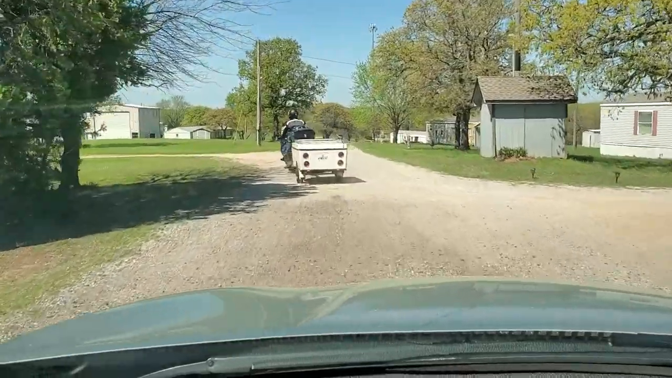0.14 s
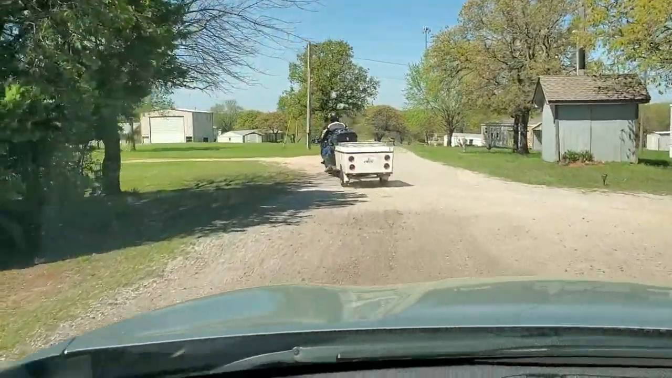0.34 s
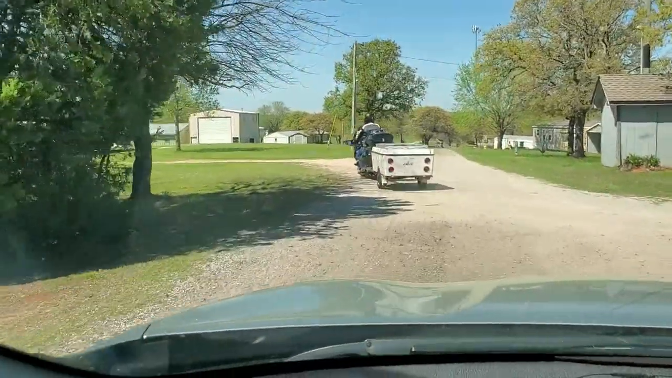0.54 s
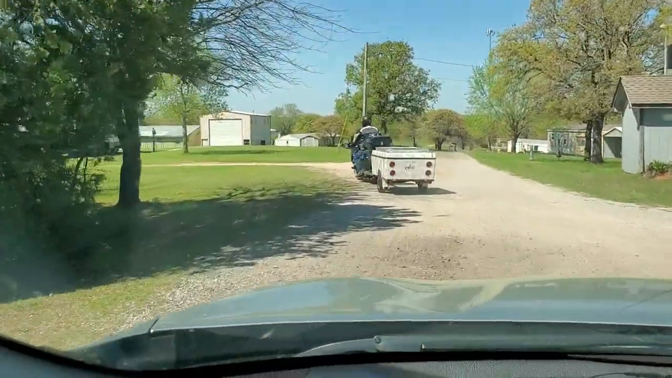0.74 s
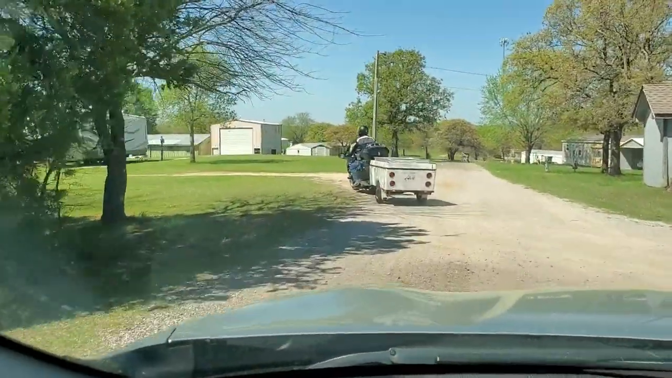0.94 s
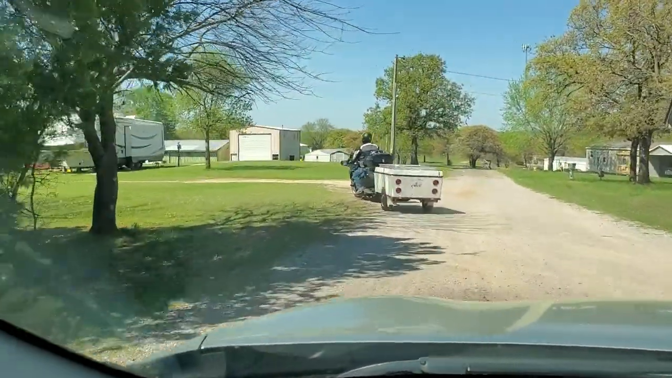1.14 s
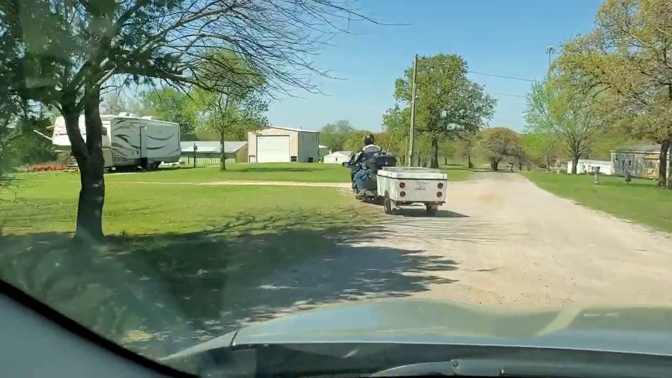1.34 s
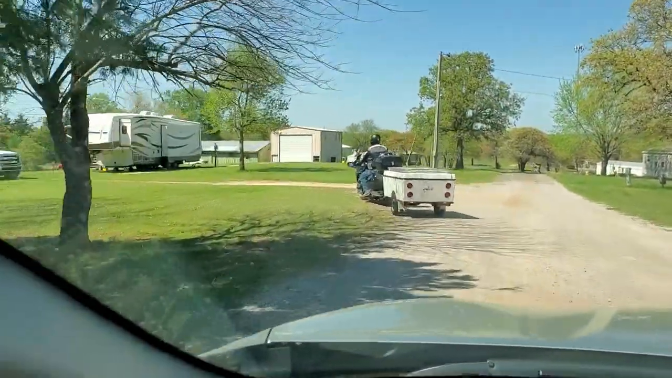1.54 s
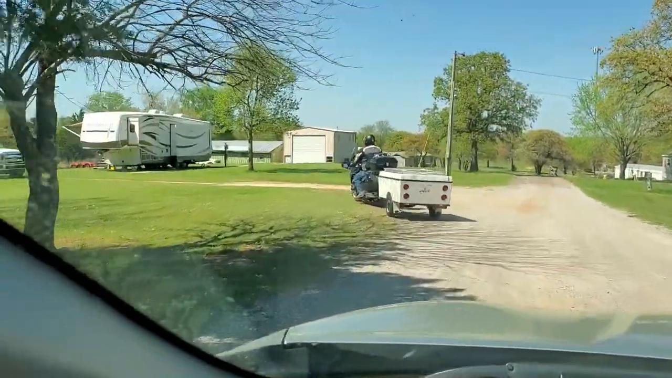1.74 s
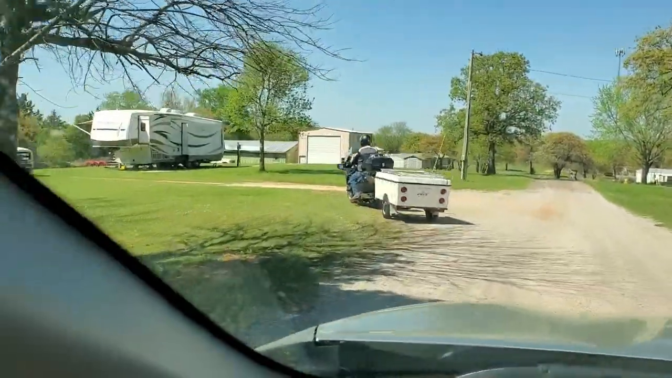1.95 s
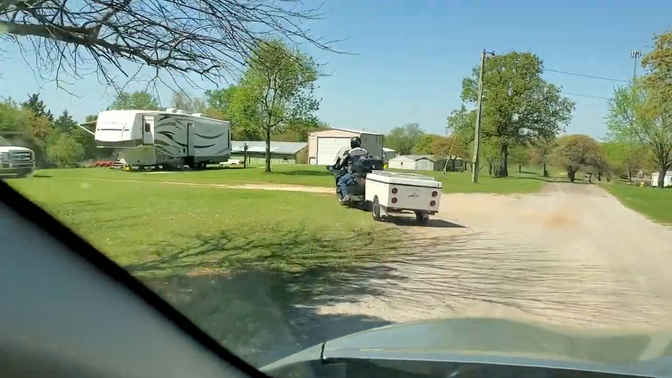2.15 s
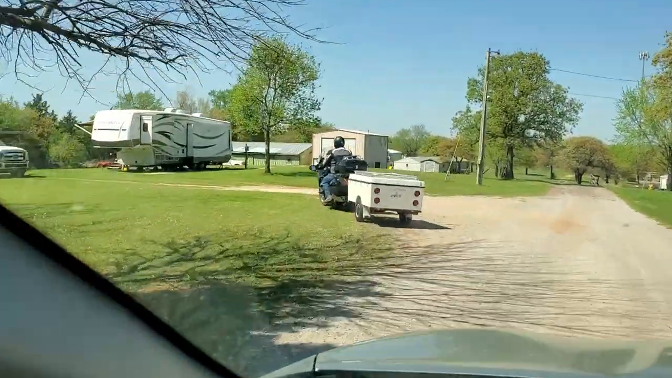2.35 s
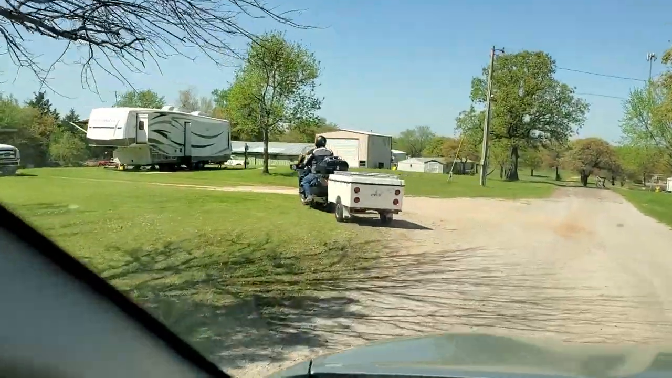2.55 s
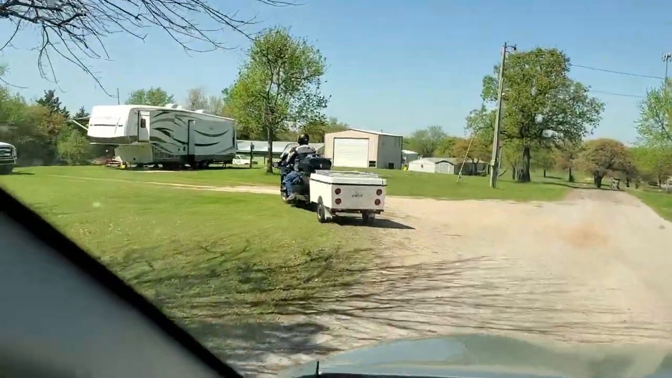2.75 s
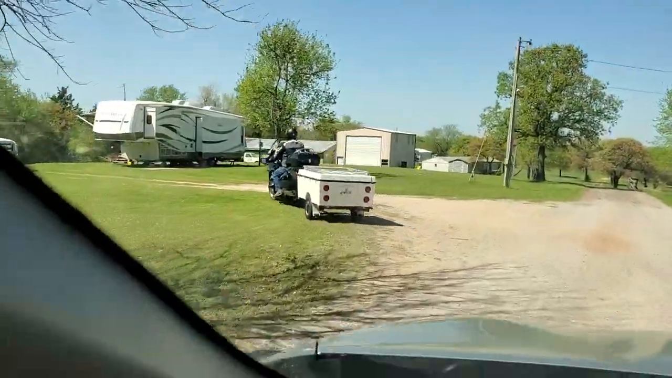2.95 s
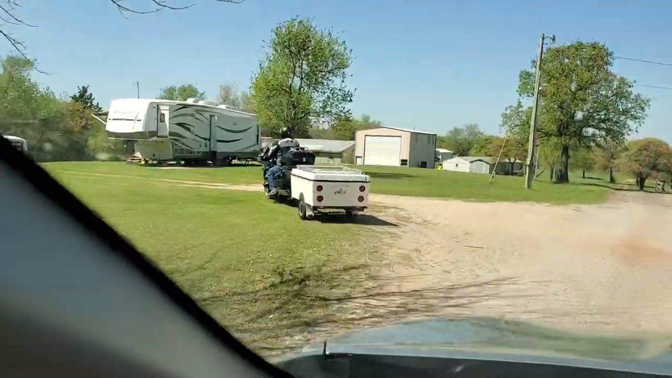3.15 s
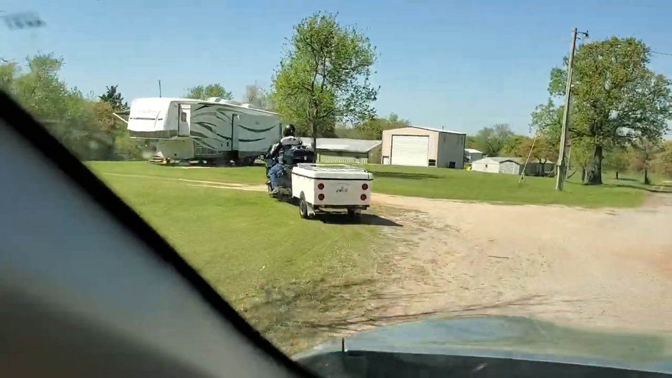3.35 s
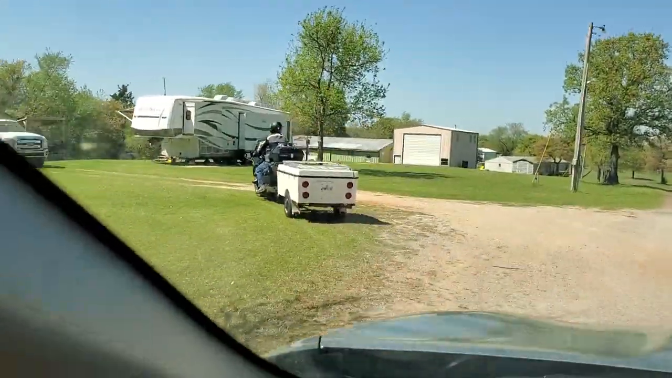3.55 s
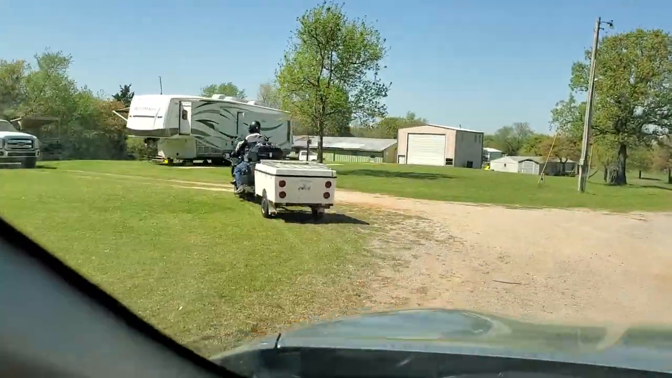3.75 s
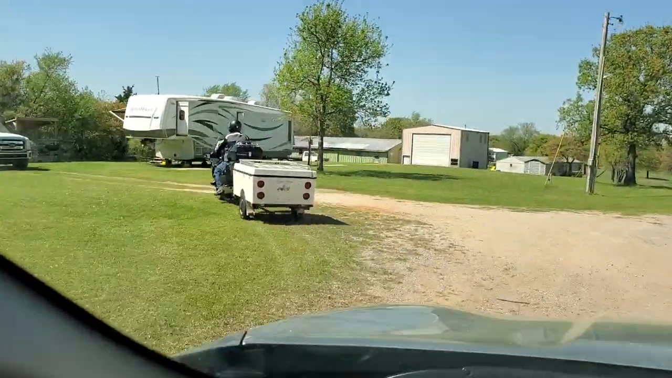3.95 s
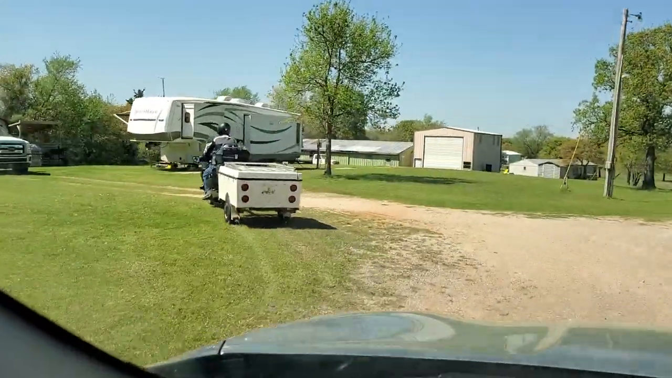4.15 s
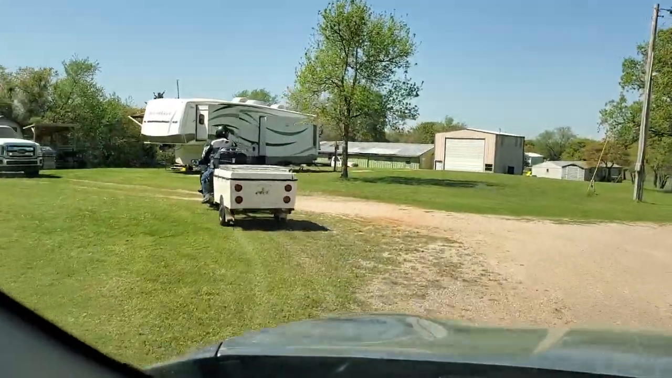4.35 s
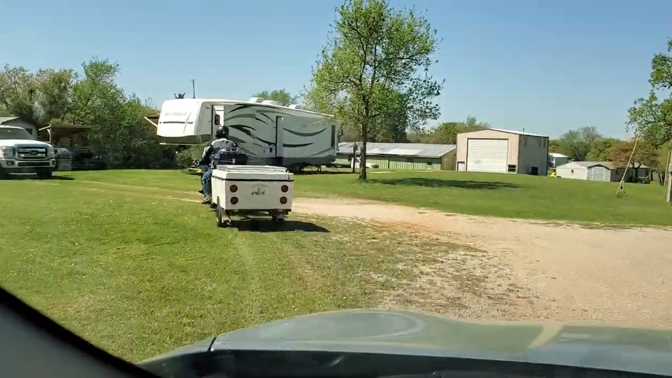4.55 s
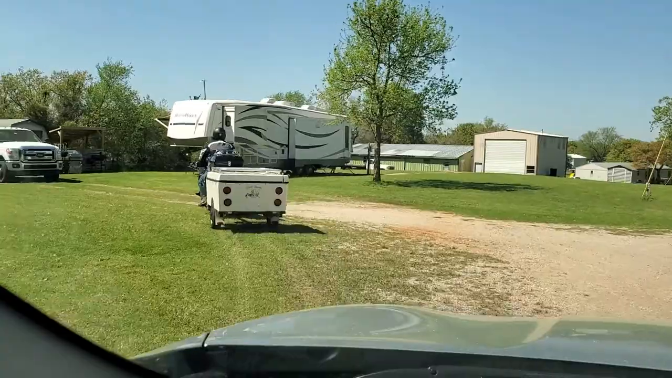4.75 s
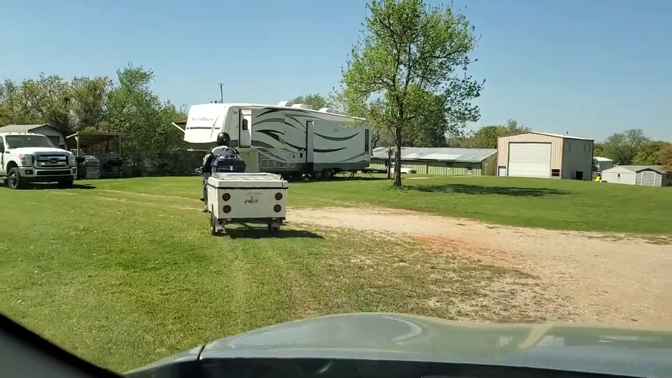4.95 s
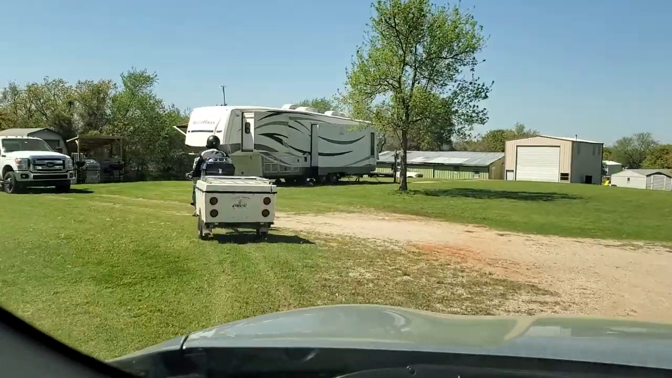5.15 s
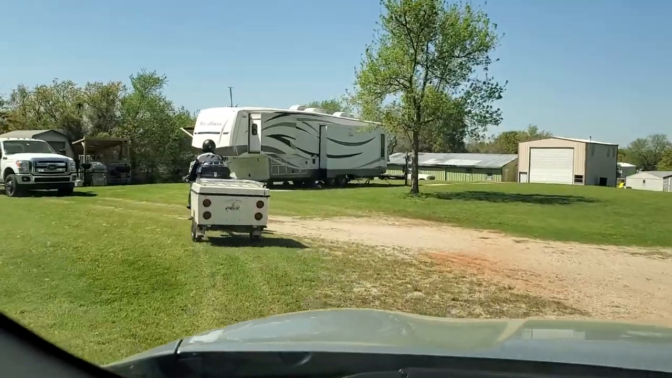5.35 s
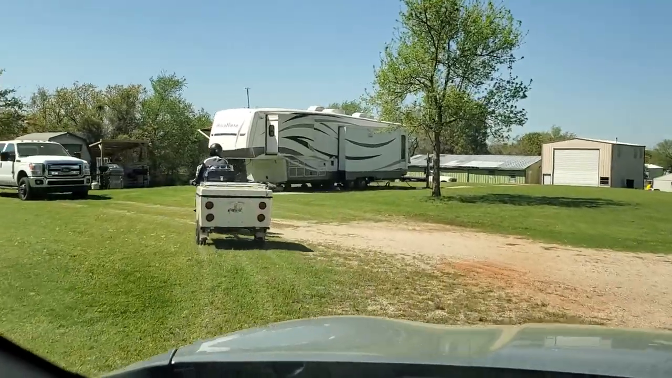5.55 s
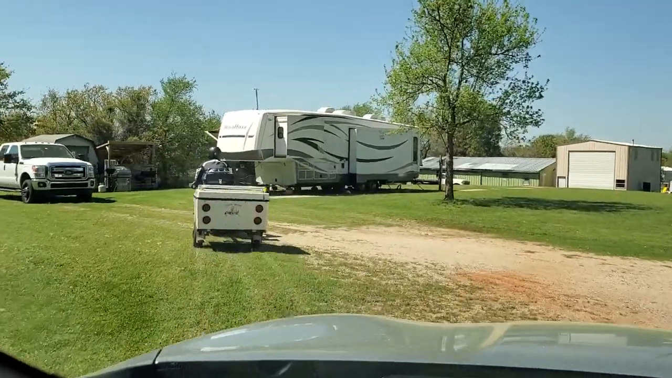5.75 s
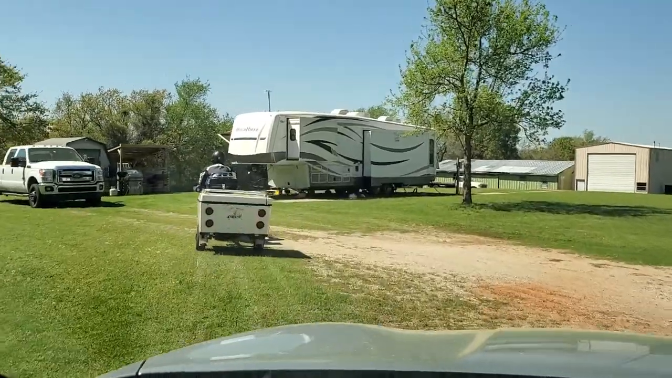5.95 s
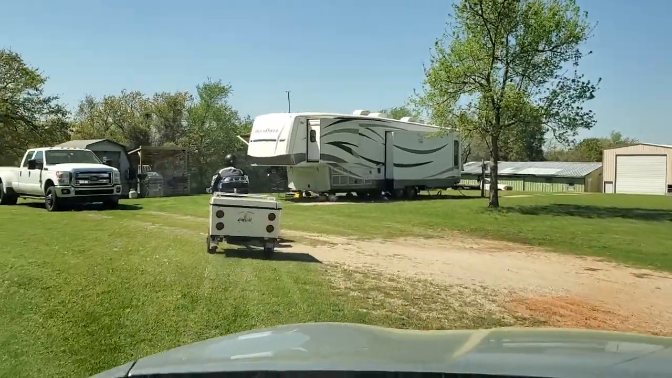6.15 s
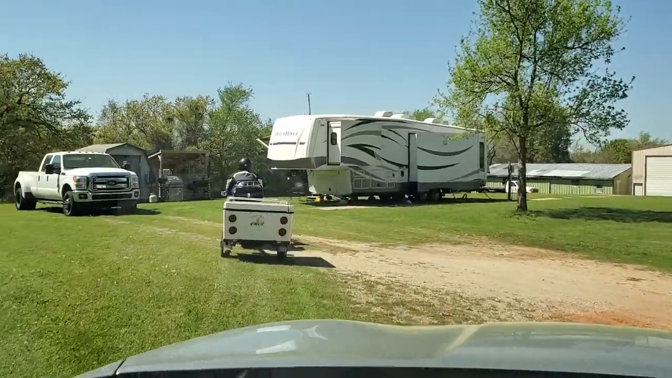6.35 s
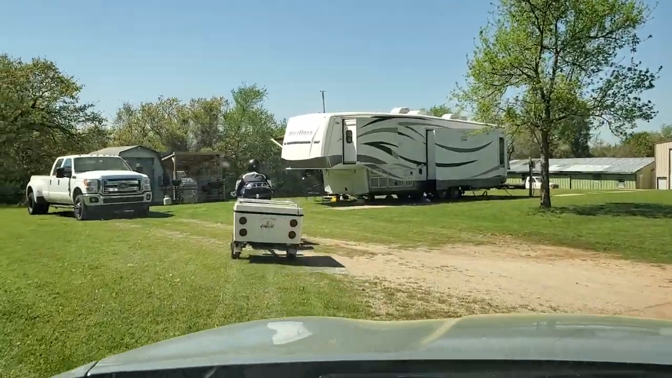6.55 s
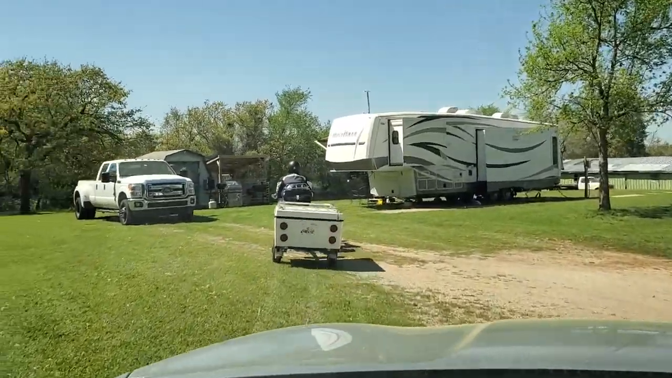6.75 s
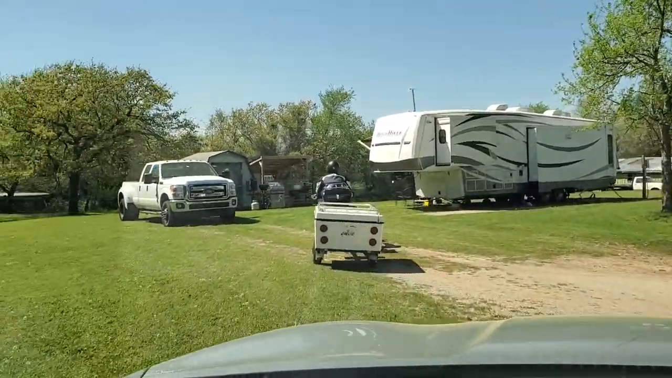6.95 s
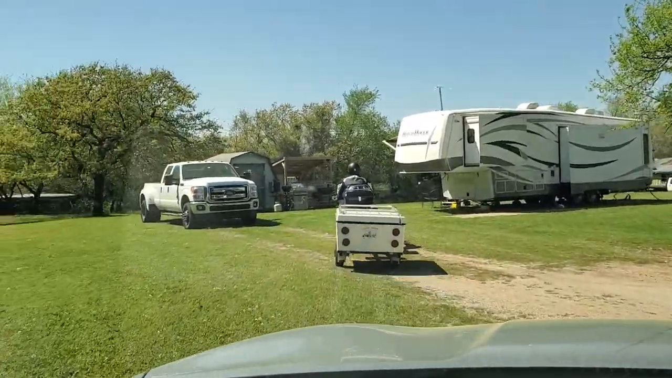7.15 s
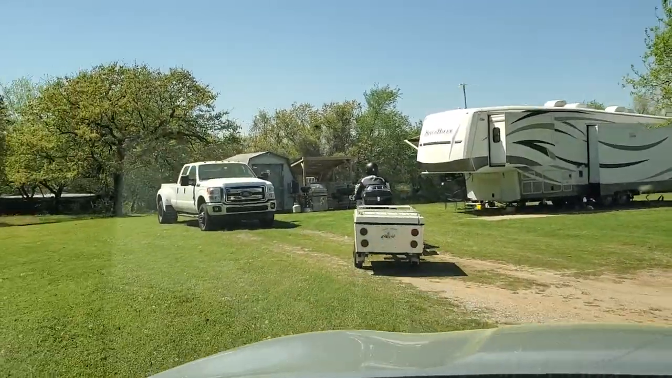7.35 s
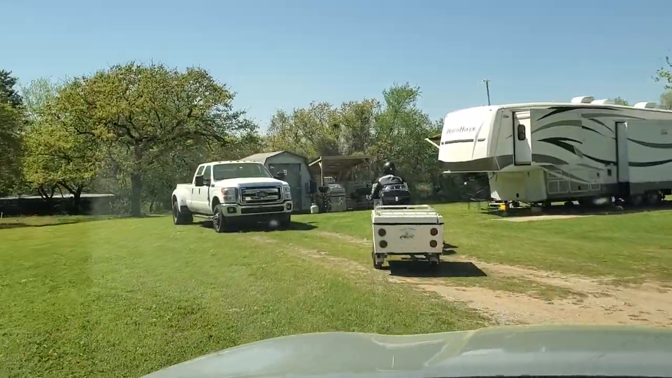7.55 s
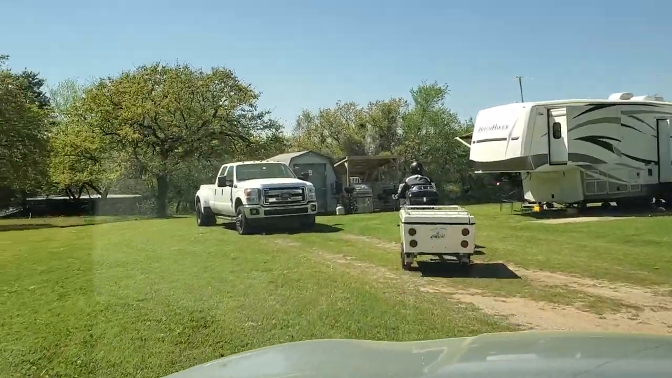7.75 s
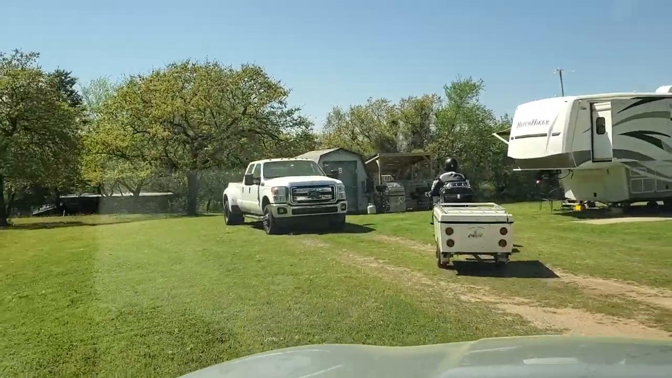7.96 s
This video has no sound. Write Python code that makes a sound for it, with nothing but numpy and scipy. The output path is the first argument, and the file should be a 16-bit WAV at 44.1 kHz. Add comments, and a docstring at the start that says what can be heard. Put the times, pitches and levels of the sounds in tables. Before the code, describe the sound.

A hand-held microphone near the windshield picks up the lumpy, booming rumble of a car rolling slowly over rough ground, with the engine throbbing low and air hissing gently from the vents. Muffled gravel crunch at the start dies away, and several dull suspension thumps follow. A short clatter of handling comes about two thirds through, after which a soft roar and swish of grass rises beneath the cabin rumble.

```python
"""Inside a car rolling slowly off a gravel track, heard by a hand-held camera near the windshield.
At first stones crunch faintly outside, the ground shakes the cabin, the engine hums low and the vents
blow, coloured by the glass as the camera turns. The hand ticks on the case at 1.5 s, and at 3 s a wheel
thumps into the first of four ruts. The crunch fades and the hand knocks on the case near 5.8 s.
By the end grass roars softly in the wheel wells and swishes under the treads, and the vents are louder."""
import sys
import numpy as np
from scipy import signal
from scipy.fft import rfft, irfft, next_fast_len
from scipy.io import wavfile
from scipy.ndimage import uniform_filter1d, map_coordinates

SR = 44100
rng = np.random.default_rng(int(sys.argv[2]) if len(sys.argv) > 2 else 0)


def int16_out(signal):
    """Quantize to a 16-bit WAV file."""
    q = np.round(np.clip(np.atleast_2d(signal).T, -1, 1) * 32767)
    wavfile.write(sys.argv[1], SR, q.astype(np.int16))


N = 356769


# The cabin's deep boom. Each row: frequency in Hz, relative level in dB.
BOOM_SPECTRUM = [(5, -60.5), (14, -29), (22, -6), (29, -11), (35, 10), (44, 10.5), (50, 0.5), (59, -8),
                 (90, -57), (200, -120)]
# The tyres' rumble, just above the boom. Each row: frequency in Hz, relative level in dB.
TYRE_SPECTRUM = [(15, -120), (44, -36), (58, -1.5), (69, 1.5), (84, -4), (98, 1.5), (113, -8.5),
                 (127, -10.5), (142, -21.5), (200, -27.5), (300, -42.5), (900, -120)]

def road_and_engine(low_cut_hz=19):
    """Uneven ground makes the cabin boom in lumps and the tyres rumble over the engine's note."""
    boom_db, tyre_db = ride()
    lumps_db = 1.6 * wobble(13)
    boom = amp(boom_db + lumps_db + 3.0) * shaking(BOOM_SPECTRUM, even_s=0.14)
    body = engine() + jolts() + boom
    body += amp(tyre_db + 4.5) * shaking(TYRE_SPECTRUM, even_s=0.083)
    # the deepest bass is rolled off
    return filtered(body, lambda hz: 1 / np.sqrt(1 + (low_cut_hz / (hz + 1)) ** 8))


def shaking(spectrum, even_s):
    """Random body vibration whose strength stays even over spans longer than even_s."""
    vibration = rush(spectrum)
    power = uniform_filter1d(vibration[1] ** 2, max(int(even_s * SR), 1))
    return unit(vibration / np.sqrt(np.abs(power) + 0.074))


# The slow rise and fall of the boom. Each row: time in seconds, relative level in dB.
BOOM_TREND = [(0, -28.5), (1.7, -27.5), (2.5, -32), (3.8, -31.5), (5.2, -29), (6.1, -34.5), (7.6, -30)]
# The rumble eases as gravel gives way to soft grass. Each row: time in seconds, relative level in dB.
TYRE_TREND = [(0, -25.5), (2.3, -25.5), (5.2, -28.5), (8.09, -32.5)]
# A wheel meets a bump. Each row: centre in seconds, boom lift in dB, rumble lift in dB.
BUMPS = [(0.51, 0, 6), (1.26, 5, 2), (1.56, 5.5, 2.5), (1.96, 7, 3.5), (2.39, 7, -0.5), (3.46, 2, 1.5),
         (3.94, 8.5, 1), (4.55, 5, 5), (5.88, 3, 2), (6.53, 2.5, 2.5), (7.3, 5, 0.5), (7.52, 6, 1)]
# The ride goes briefly smooth. Each row: centre in seconds, boom change in dB, rumble change in dB.
LULLS = [(0.19, -10, 0), (1.03, -10, 0), (2.78, 3.5, -6), (4.09, -7, 1.5), (4.84, -9, -3), (5.43, -2, -4),
         (5.6, -9, -3), (5.98, -4, -3.5), (6.35, -11, -8), (6.75, -8, -1.5), (7.15, -7, -1), (7.42, -9, 0),
         (7.62, 0, -4)]

def ride():
    """Level curves in dB for boom and rumble: slow trends, lifted by bumps and lowered by lulls."""
    trend = np.array(curves(BOOM_TREND) + curves(TYRE_TREND))
    rises = sum(np.outer(rise_db, bump(s)) for s, *rise_db in BUMPS)
    drops = sum(np.outer(drop_db, lull(s)) for s, *drop_db in LULLS)
    return trend + rises + drops


def bump(s):
    """The suspension is pressed, stays loaded while the wheel climbs over, and settles."""
    return swell(s, attack_s=0.08, hold_s=0.047, release_s=0.084)


def lull(s):
    """The body settles for a moment."""
    return swell(s, attack_s=0.035, hold_s=0.077, release_s=0.035)


# The engine at a crawl. Each row: time in seconds, crankshaft rate in Hz, throb and drone in relative dB.
ENGINE_REVS = [(0, 24.8, -29, -29), (0.5, 25.5, -34, -26), (1.25, 24.1, -22.5, -27.5),
               (1.75, 23.7, -28.5, -31.5), (2.3, 25.7, -29, -25.5), (2.65, 23, -28.5, -30),
               (3.05, 21.9, -35.5, -32), (3.9, 22, -35, -39), (4.55, 22.8, -28, -33),
               (5.15, 21, -32, -34.5), (5.8, 19.5, -34, -41), (6.6, 19, -41, -33), (6.95, 21, -24.5, -44),
               (7.15, 25.2, -33.5, -45), (7.6, 23.5, -29.5, -42), (8.09, 26, -32.5, -38)]
# The drone's partials. Each row: multiple of the crankshaft rate, relative level in dB.
DRONE_ORDERS = [(3, -7.5), (4, -1.5), (6, -18.5)]

def engine():
    """Two firings a turn make a throb that dips in the lulls; higher orders drone unevenly above it."""
    crank_hz, throb_db, drone_db = curves(ENGINE_REVS)
    phase = 2 * np.pi * np.cumsum(crank_hz * (1 + 0.01 * wobble(9))) / SR
    lulls_db = sum(drop_db * lull(s) for s, drop_db, _ in LULLS)
    throb = amp(throb_db + lulls_db + 1.4 * wobble(9)) * np.sin(2 * phase)
    drone = sum(amp(drone_db + db + 2.43 * wobble(7)) * np.sin(order * phase)
                for order, db in DRONE_ORDERS)
    return 2 * (throb + drone)


# A wheel drops into a rut. Each row: start in seconds, level in dB.
RUTS = [(2.995, -12), (5.245, -17), (6.402, -17), (8.045, -13)]
# The cabin's low air modes. Each row: frequency in Hz, relative level in dB, 60 dB decay in seconds.
CABIN_MODES = [(45, -5, 0.38), (76.8, 4.5, 0.2), (99, 1, 0.13)]

def jolts(attack_s=0.0062):
    """Each thump of the suspension rings the cabin's low modes, in a slightly different balance."""
    out = np.zeros(N + SR)
    t = np.arange(SR // 2) / SR
    for s, jolt_db in RUTS:
        ring = sum(ringing(t, hz, db + rng.normal(0, 1), t60) for hz, db, t60 in CABIN_MODES)
        out[round(s * SR):][:len(t)] += amp(jolt_db) * ring * (1 - np.exp(-t / attack_s))
    return out[:N]


# The air from the vents slowly builds. Each row: time in seconds, duct level in dB.
DUCT_LEVEL = [(0, -35), (3.2, -35), (5.8, -33.5), (8.09, -32.5)]
# The dark rush in the ducts. Each row: frequency in Hz, relative level in dB.
DUCT_SPECTRUM = [(20, -62), (150, 2.5), (270, -1.5), (400, -8), (800, -11), (1150, -16.5), (1900, -16),
                 (2400, -25), (4000, -65), (9000, -120)]
# The ducts' hollow resonances. Each row: centre in Hz, width in Hz, boost in dB.
DUCT_MODES = [(333.3, 30, 5), (498, 70, 6), (730, 35, 4.5), (905, 65, 6), (960, 70, 4.5), (1140, 45, 3),
              (1430, 70, 2.5), (1530, 70, 2.5)]
# The bright hiss at the outlets. Each row: frequency in Hz, relative level in dB.
OUTLET_SPECTRUM = [(200, -54), (1200, -18), (2200, 0.5), (2560, 0), (2850, 0), (4200, 0), (5000, -7.5),
                   (7500, -9), (8100, -12.5), (10100, -12), (10900, -21.5), (11900, -13), (14000, -46)]
# A side vent, louder when the camera faces it. Each row: time in seconds, level in dB.
SIDE_VENT_LEVEL = [(0, -68), (1, -56.5), (1.8, -56), (2.15, -65), (3.5, -61), (3.9, -52), (7.5, -49.5),
                   (8.09, -56)]
# The side vent's hollow hiss. Each row: frequency in Hz, relative level in dB.
SIDE_VENT_SPECTRUM = [(600, -65), (1250, -12), (1420, 1.5), (1620, -12.5), (1810, 4.5), (1940, 8),
                      (2070, 7.5), (2250, -9.5), (7500, -25.5), (14000, -64)]

def vents(fan_hz=180, fan_db=-43, mean_hiss_db=-50.5):
    """The fan hums, air rushes through resonant ducts and hisses at the outlets."""
    duct_db, = curves(DUCT_LEVEL)
    hiss_db = mean_hiss_db + 1.26 * (duct_db - duct_db.mean())  # hiss builds faster than the rush
    duct = amp(duct_db + 0.53 * wobble(9)) * rush(DUCT_SPECTRUM, DUCT_MODES)
    hiss = amp(hiss_db + 0.85 * wobble(5.3)) * rush(OUTLET_SPECTRUM)
    side = amp(curves(SIDE_VENT_LEVEL)[0] + 0.65 * wobble(13)) * rush(SIDE_VENT_SPECTRUM)
    hum_level = amp(fan_db + 2.4 * wobble(4.9))
    hum_phase = 2 * np.pi * np.cumsum(fan_hz * (1 + 0.0072 * wobble(5.3))) / SR
    return duct + hiss + side + hum_level * np.sin(hum_phase)


# The wheel wells' roar dips, then grows as the turf deepens. Each row: time in seconds, level in dB.
ROAR_LEVEL = [(0, -45.5), (3, -60), (5.5, -45.5), (7, -39.5), (8.09, -39.5)]
# The colour of that roar. Each row: frequency in Hz, relative level in dB.
ROAR_SPECTRUM = [(110, -35), (160, -7.5), (215, 5), (350, -15), (475, 6.5), (590, -17), (725, -3.5),
                 (780, -8.5), (940, -7.5), (1100, -15), (8000, -72)]
# A tyre scuffs through loose dirt. Each row: centre in seconds, level in dB.
SCUFFS = [(0.2, -40), (2.33, -41), (7.7, -51)]
# The treads swish through dust, then grass. Each row: time in seconds, level in dB.
SWISH_LEVEL = [(0, -56), (1.1, -55), (2.4, -65), (3, -57.5), (4.8, -52.5), (6.0, -55), (6.55, -47),
               (6.83, -51), (7.0, -50), (7.45, -50), (8.09, -55)]
# The thin, high colour of that swish. Each row: frequency in Hz, relative level in dB.
SWISH_SPECTRUM = [(1500, -45), (2570, -12), (2830, -1.5), (3330, 2.5), (3650, -1.5), (3900, -18),
                  (7500, -14.5), (14000, -51)]

def grass():
    """Dirt and turf roar in the wheel wells, surging where a tyre scuffs, and swish under the treads."""
    roar_level = amp(curves(ROAR_LEVEL)[0]) + sum(amp(db) * bump(s) for s, db in SCUFFS)
    swish = amp(curves(SWISH_LEVEL)[0] + 0.95 * wobble(7.4)) * rush(SWISH_SPECTRUM)
    roar = roar_level * amp(0.98 * wobble(14)) * rush(ROAR_SPECTRUM)
    return roar + swish


# The hand on the camera. Each row: start in seconds, thud level in dB, click level in dB, click pitch in Hz.
TOUCHES = [(1.5345, -59, -45, 12000), (5.788, -27, -32, 500), (5.826, -25, -40, 560),
           (5.8367, -21.5, -30, 700), (5.838, -45, -32, 2940), (5.839, -45, -45.5, 6300),
           (5.855, -21.5, -29, 480), (5.864, -25, -42, 2800)]
# The case's low thud. Each row: frequency in Hz, relative level in dB, 60 dB decay in seconds.
CASE_MODES = [(121, -1, 0.17), (163.4, 0.5, 0.14), (197, -1, 0.19), (409, -8.5, 0.087), (490, -3, 0.064),
              (917, -9, 0.048)]
# The plastic shell's ring. Each row: frequency in Hz, relative level in dB, 60 dB decay in seconds.
SHELL_MODES = [(1290, -6, 0.07), (2700, -11, 0.07), (3060, -11, 0.07), (3560, -4, 0.06)]

def handling(click_t60=0.055, click_octaves=0.5, attack_s=0.003):
    """Each touch scratches the camera's shell, rings it briefly and thuds in the case."""
    out = np.zeros((2, N + SR))
    t = np.arange(SR // 4) / SR
    hz = np.fft.rfftfreq(len(t), 1 / SR)
    thud = sum(ringing(t, *mode) for mode in CASE_MODES)
    for s, thud_db, click_db, click_hz in TOUCHES:
        # a contact excites a broad band around its own pitch
        band = lambda f: np.exp(-(np.log2((f + 1) / click_hz) / click_octaves) ** 2)
        scratch = irfft(rfft(rng.standard_normal((2, len(t)))) * band(hz), len(t))
        click = amp(-60 * t / click_t60) * unit(scratch)
        ring = sum(band(f) * ringing(t, f, db, t60) for f, db, t60 in SHELL_MODES)
        touch = amp(thud_db) * thud + amp(click_db) * (click + ring)
        out[:, round(s * SR):][:, :len(t)] += touch * (1 - np.exp(-t / attack_s))
    return out[:, :N]


# The crunch fades as loose stones give way to grass. Each row: time in seconds, level in dB.
CRUNCH_LEVEL = [(0, -51.5), (3.6, -62), (5, -61), (8.09, -68)]
# The muffled colour of the stones. Each row: frequency in Hz, relative level in dB.
CRUNCH_SPECTRUM = [(60, -50), (300, -10), (1000, 9), (2500, -11), (3500, -12), (4350, -9), (5000, -17),
                   (6500, -23), (15000, -60)]

def gravel(typical_per_s=900, grain_t60=0.0079):
    """Stones grind under the tyres in clumps, blurred and dulled by the closed cabin."""
    hits = rng.random(N) < typical_per_s * amp(3 * wobble(8)) / SR
    sizes = amp(3 * np.minimum(rng.exponential(size=N), 3))
    impacts = hits * sizes * rng.standard_normal((2, N))
    t = np.arange(SR // 100) / SR
    scatter = rng.standard_normal((2, len(t))) * amp(-60 * t / grain_t60)
    grains = signal.fftconvolve(impacts, scatter, axes=1)[:, :N]
    return amp(curves(CRUNCH_LEVEL)[0]) * at_ports(grains, lambda hz: along(CRUNCH_SPECTRUM, hz))


# The reflection off the glass. Each row: time in seconds, delay in milliseconds, strength as a gain.
REFLECTION = [(0, 2.1, 0.078), (1.2, 2.16, 0.24), (2.1, 2, 0.3), (2.9, 1.99, 0.24), (3.5, 2, 0.1),
              (3.85, 2.12, 0.2), (5.6, 2.11, 0.21), (6.6, 2.12, 0.1)]

def windshield(x, dull_hz=4200):
    """Two bounces between glass and dashboard comb the sound; the path changes as the camera turns."""
    delay_ms, strength = curves(REFLECTION)
    now = np.arange(N)
    earlier = now - delay_ms * SR / 1000

    def bounce(sound):
        dulled = filtered(sound, lambda hz: 1 / (1 + (hz / dull_hz) ** 2))
        return strength * np.array([np.interp(earlier, now, channel) for channel in dulled])

    return (x + bounce(x + bounce(x))) / np.sqrt(1 + strength ** 2)


def cabin(x, t60=0.04, predelay_s=0.005, low_cut_hz=500):
    """Seats and trim scatter the upper range into a brief tail."""
    t = np.arange(SR // 10) / SR
    tail = rng.standard_normal((2, len(t))) * amp(-60 * t / t60) * (t > predelay_s)
    wet = signal.fftconvolve(x, tail / np.linalg.norm(tail[1]), axes=1)[:, :N]
    return x + 0.12 * filtered(wet, lambda hz: hz / (hz + low_cut_hz))


# The stereo image at the two microphone ports.
# Each row: frequency in Hz, likeness from 0 to 1, lag of the left port in radians.
PORT_IMAGE = [(60, 1, .03), (111, 0.97, .06), (170, 0.9, .15), (280, 0.82, 0.72), (554, 0.85, 0.4),
              (693, 0.58, 1.9), (960, 0.49, 4.2), (1370, 0.9, 4.05), (2020, 0.36, 4), (2940, 1, 5.2),
              (4110, 0, 27.5), (6900, 0, 48)]

def at_ports(pair, colour_db):
    """Two unrelated signals become one coloured cabin sound: alike in the bass, diffuse in the treble."""
    size = next_fast_len(N + SR // 2)
    hz = np.fft.rfftfreq(size, 1 / SR)
    left_only, right = rfft(pair, size) * amp(colour_db(hz))
    alike, lag = along(PORT_IMAGE, hz)
    alike = np.clip(alike, 0, 1)
    left = alike * np.exp(-1j * lag) * right + np.sqrt(1 - alike ** 2) * left_only
    return unit(irfft([left, right], size)[:, :N])


def rush(spectrum, modes=()):
    """Stereo turbulence with a spectrum and resonant humps."""
    humps = lambda hz: sum(db / (1 + (2 * (hz - centre) / width) ** 2) for centre, width, db in modes)
    return at_ports(rng.standard_normal((2, N)), lambda hz: along(spectrum, hz) + humps(hz))


def ringing(t, hz, db, t60):
    """One struck mode, dying away by 60 dB in t60 seconds."""
    return amp(db - 60 * t / t60) * np.sin(2 * np.pi * hz * t)


def swell(s, attack_s, hold_s, release_s):
    """A 0-1 envelope that rises, holds around time s and falls."""
    start, end = s - hold_s / 2, s + hold_s / 2
    return np.interp(np.arange(N) / SR, [start - attack_s, start, end, end + release_s], [0, 1, 1, 0])


def wobble(rate):
    """A smooth random curve, rate knots a second."""
    return map_coordinates(rng.standard_normal(int(N * rate / SR) + 4), [np.arange(N) * rate / SR])


def curves(rows):
    """One value per sample for each column after the time."""
    times, *columns = np.transpose(rows)
    return [np.interp(np.arange(N) / SR, times, column) for column in columns]


def along(rows, hz):
    """Each column after the frequency, read on a log axis."""
    knots_hz, *columns = np.transpose(rows)
    return np.squeeze([np.interp(np.log(hz + 1), np.log(knots_hz + 1), column) for column in columns])


def filtered(x, response):
    """x shaped by a frequency response."""
    size = next_fast_len(N + SR // 2)
    return irfft(rfft(x, size) * response(np.fft.rfftfreq(size, 1 / SR)), size)[..., :N]


def amp(db):
    """Decibels as a gain."""
    return 10 ** (np.asarray(db) / 20)


def unit(x):
    """Scaled so that the right (last) channel has rms 1."""
    return x / np.sqrt(np.mean(np.atleast_2d(x)[-1] ** 2) + 1e-20)


def scene():
    """Everything that reaches the camera inside the cabin."""
    return road_and_engine() + grass() + cabin(windshield(vents() + gravel())) + handling()


# The shading of the left microphone port. Each row: frequency in Hz, gain in dB.
LEFT_SHADE = [(60, -8), (200, -7.5), (370, -10), (670, -6.5), (950, -13.5), (1400, -12), (2200, -13),
              (4100, -13), (6000, -16.5), (7300, -30.5), (8200, -9), (10000, -20.5), (13000, -28)]

def record(dry, top_hz=14450):
    """The left port is weaker and duller; nothing is kept above the band limit."""
    left = filtered(dry[0], lambda hz: amp(along(LEFT_SHADE, hz)))
    return filtered(np.array([left, dry[1]]), lambda hz: hz < top_hz)


dry = scene()
out = record(dry)
int16_out(out)
```